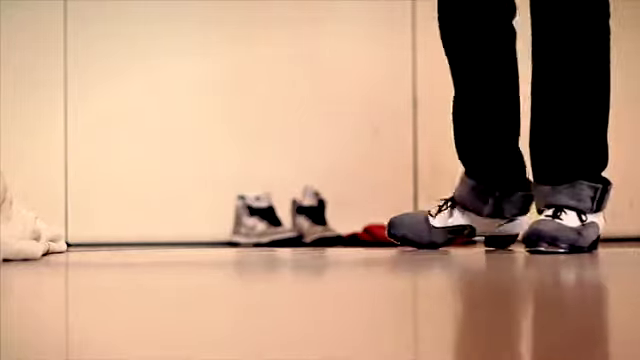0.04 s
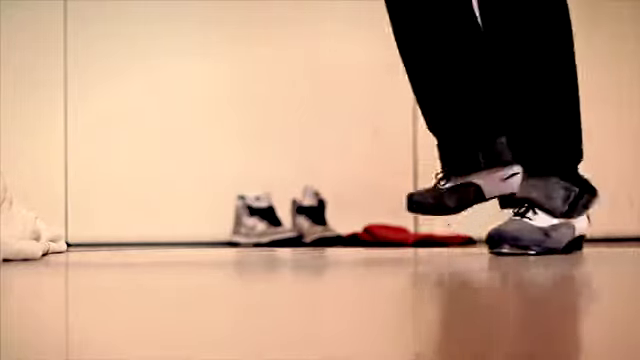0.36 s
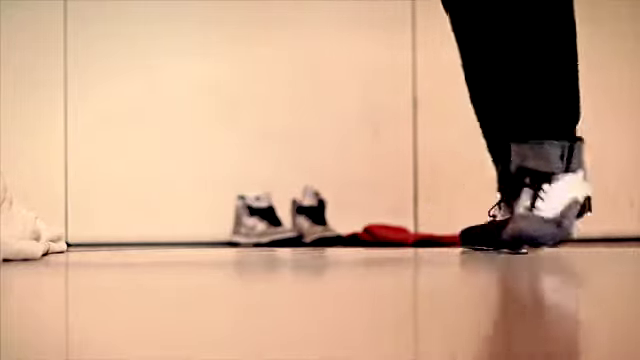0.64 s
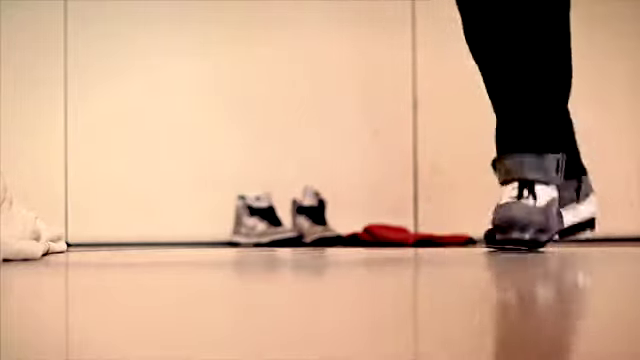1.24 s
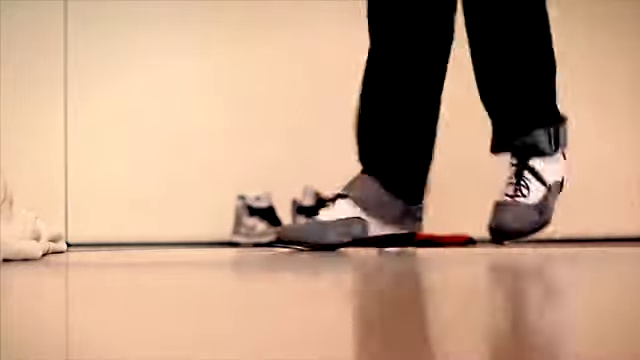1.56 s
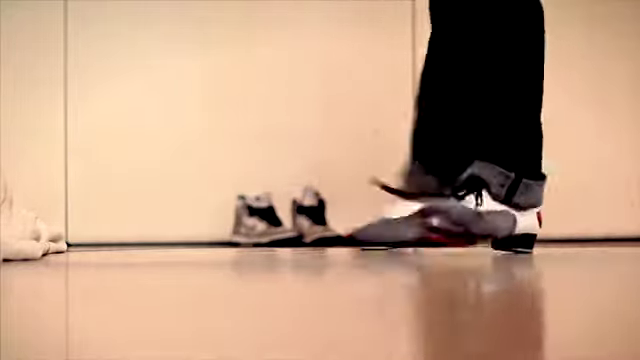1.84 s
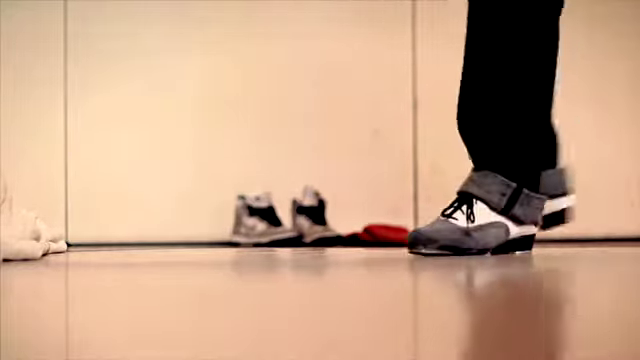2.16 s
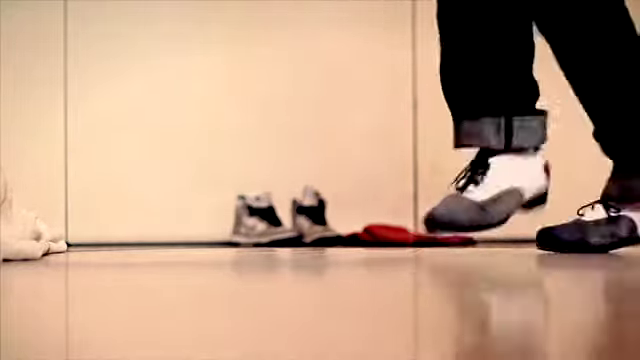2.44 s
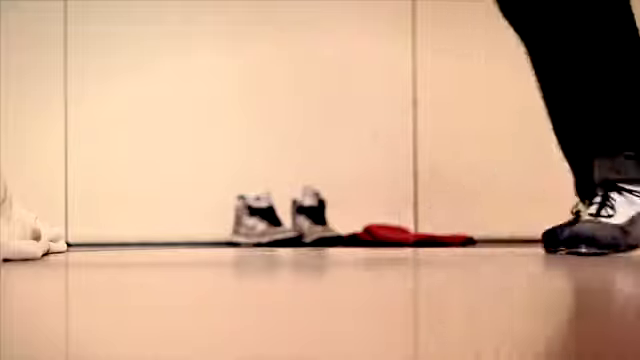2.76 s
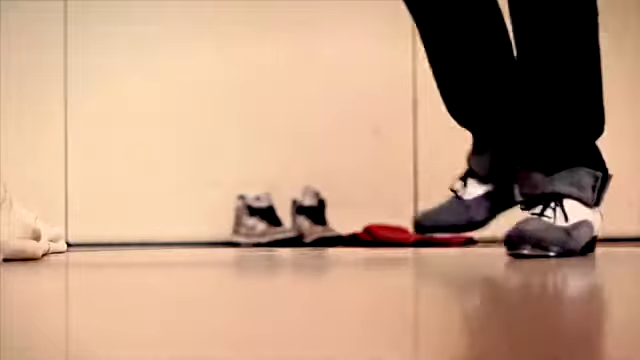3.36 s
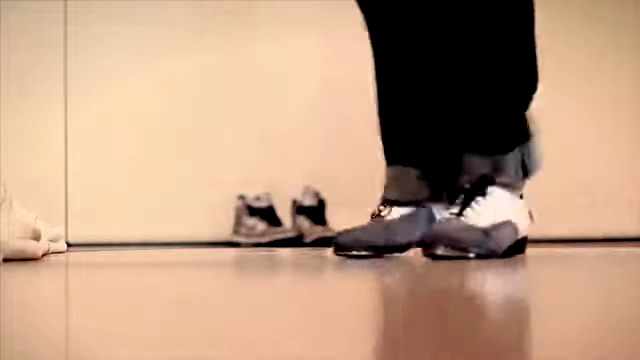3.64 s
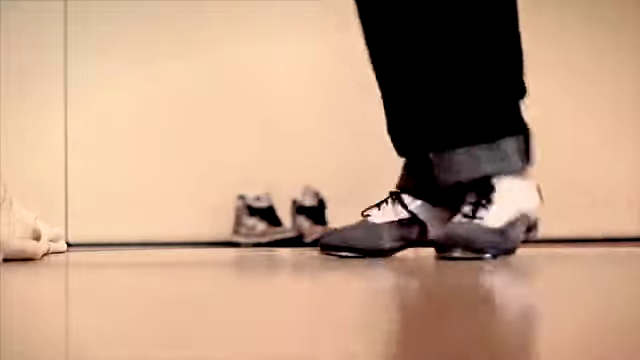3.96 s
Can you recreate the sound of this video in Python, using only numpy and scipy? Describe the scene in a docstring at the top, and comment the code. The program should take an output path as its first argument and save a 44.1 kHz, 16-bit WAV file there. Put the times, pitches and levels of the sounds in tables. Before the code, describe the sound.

Tap shoes click and stamp close by on a wooden floor, each hit echoing in a bare studio. Stamps land at the start and around 0.3, 1 and 1.6 seconds, with quick metallic taps between. A run of lighter taps follows from about 1.8 to 2.8 seconds, including a brief scuff and another stamp. Heavy, rattling stamps come from 3 to 3.6 seconds, then two last taps.

```python
"""Sharp metallic taps and heavy stamps ring out in a bare studio: a tap dancer, close by, on a sprung floor.
Each contact rings the shoe's metal plate, clacks the sole and thumps the boards. Flat stamps rattle the
plates, two heel drops and a faint tap clack hollowly, the floor booms under the weight and a toe scuffs.
Clicks flutter between floor and ceiling before the room takes over; a fast limiter holds the peaks."""
import sys
import numpy as np
from scipy import signal
from scipy.fft import rfft, irfft, next_fast_len
from scipy.io import wavfile
from scipy.ndimage import uniform_filter1d, minimum_filter1d

SR = 44100
rng = np.random.default_rng(int(sys.argv[2]) if len(sys.argv) > 2 else 0)


def output_pcm(signal):
    """Save a mono or channel-first signal as 16-bit PCM at the path in sys.argv[1].

    Samples are clipped to [-1, 1] before scaling.
    """
    pcm = np.clip(np.atleast_2d(signal).T, -1, 1) * 32767
    wavfile.write(sys.argv[1], SR, np.round(pcm).astype(np.int16))


N = 176400
LENGTH = 65536  # samples in one hit's buffer
T, HZ = np.arange(LENGTH) / SR, np.fft.rfftfreq(LENGTH, 1 / SR)
CLICK_GAIN, BITE_S = np.sqrt(SR / 200), .001  # common gain of the clicks; attack of plate and heel


# toe taps, plus the bright plate ring and metal after-snaps of stamps
# (t/s, plate ring/dB, sole clack/dB, metal snap/dB, room send/dB, plate pitch/Hz)
TAPS_AND_SNAPS = [(0.2605, -9, -21, -34, -12, 4200), (0.292, -29, -46, -26, -15, 4200),
                  (0.4763, -24, -30.5, -31, 0.5, 3400), (0.5898, -16.5, -26, -24.5, -1, 3790),
                  (0.6562, -24, -28, -26.5, -0.5, 3920), (0.7381, -26.5, -27.5, -48, 1, 3870),
                  (1.194, -29.5, -28.5, -27.5, 1, 3900), (1.309, -13.5, -20, -19, -3.5, 4130),
                  (1.4877, -14.5, -22, -24.5, -0.5, 3830), (1.85, -17.5, -25.5, -20, -2.5, 4060),
                  (1.9584, -20, -23, -18.5, -5, 3920), (2.059, -21, -28, -29.5, 1, 3560),
                  (2.1746, -25, -29, -26.5, 3, 4100), (2.291, -19.5, -26, -27, -1, 4000),
                  (2.5054, -62, -25.5, -17, -9.5, 4320), (2.5972, -21.5, -25, -22.5, -6.5, 4140),
                  (2.7209, -23, -29.5, -30, -2.5, 4030), (2.819, -25, -29.5, -34, 1.5, 4030),
                  (3.855, -14.5, -26, -25, -2.5, 3740), (3.9118, -29, -23, -28, -0.5, 3330)]
# weighty heels and stamps (t/s, plate ring/dB, sole clack/dB, metal snap/dB, room send/dB, thump/dB)
HEAVY_STAMPS = [(-.03, -15, -18, -22.5, 1.5, -19), (0.2611, -14.5, -13, -13, -3, -19),
                (0.8399, -23.5, -23.5, -29.5, 0.5, -31.5), (0.963, -7, -14, -15, -5, -15),
                (.972, -31, -16.5, -14.5, 1, -17), (1.5369, -18, -20.5, -22, 0, -28),
                (1.6329, -8.5, -14, -15, -3.5, -17), (2.49, -12.5, -14, -17, -4.5, -24.5),
                (2.9585, -15, -13, -11.5, -2.5, -20), (2.966, -20, -41, -41, 6.5, -28.5),
                (3.202, -13, -15, -17.5, -1.5, -44), (3.21, -34, -20.5, -12.5, 0, -17),
                (3.4435, -17, -20.5, -22, 1, -28), (3.455, -25, -19.5, -15, -8, -18.5),
                (3.633, -8, -15.5, -9.5, -9, -22), (3.6415, -42, -19, -15, 2, -18)]
def footwork():
    """Each contact layers plate, sole and boards, then sets off flutter, wash and standing waves."""
    out, echoes, standing = np.zeros(N), ceiling_flutter(), standing_waves()
    bite_delay = np.exp(-2j * np.pi * HZ * BITE_S)
    # taps and snaps set their thump 7 dB under their clack
    taps = [(s, rung, sole, snap, send, sole - 7, hz) for s, rung, sole, snap, send, hz in TAPS_AND_SNAPS]
    stamps = [(*row, PLATE_HZ) for row in HEAVY_STAMPS]
    for s, ring_db, clack_db, snap_db, send_db, thump_db, hz in taps + stamps:
        landing = amp(clack_db) * sole_clack() + amp(snap_db) * metal_snap()
        landing += amp(thump_db - 1.5) * board_knock()
        plate = amp(ring_db) * rfft(plate_ring(hz))
        click = plate + rfft(landing) * bite_delay
        wash = amp(send_db) * room_feed(plate, clack_db, snap_db, thump_db) * room_tail()
        hit = CLICK_GAIN * irfft(click * (1 + echoes) + wash) + amp(thump_db) * standing
        add(out, s, hit[:SR])
    return out


# modes of the shoe's metal plate (f/Hz, level/dB, t60/s)
PLATE_MODES = [(3450, -6, .004), (3950, 0, .008), (4450, -6, .004), (7200, -14, .003)]
PLATE_HZ = 3950  # its main mode
def plate_ring(hz):
    """The struck plate's bright ping, its main mode tuned near hz."""
    return ring(PLATE_MODES, BITE_S, stretch=hz / PLATE_HZ)


# dry midrange colour of the sole (f/Hz, level/dB)
SOLE_COLOUR = [(150, -15), (450, -12.5), (700, -1.5), (1400, -3), (2200, -5.5), (3200, -1), (6000, -71)]
def sole_clack():
    """The sole slaps the floor and gives the hit its body."""
    return blow(SOLE_COLOUR, t60=.044, grit=.91)


# crisp colour of metal on the floor (f/Hz, level/dB)
SNAP_COLOUR = [(1000, -18), (3000, -15.5), (5000, 4), (6400, 2.5), (7600, 1.5), (9000, -7), (11000, -16.5),
               (16000, -30)]
def metal_snap():
    """The plate meets the floor and gives the hit its edge."""
    return blow(SNAP_COLOUR, t60=.0091, grit=1)


# modes of the floorboards (f/Hz, level/dB, t60/s)
BOARD_MODES = [(149, -0.5, 0.039), (300.6, -1, 0.037)]
def board_knock():
    """The boards answer with a low wooden knock."""
    return ring(BOARD_MODES, rise_s=.00597)


# hollow clacks: two heel drops and one faint light tap (t/s, level/dB)
HOLLOW_CLACKS = [(1.537, -19.5), (1.635, -19.5), (2.377, -30.5)]
# modes of the heel block (f/Hz, level/dB, t60/s)
HEEL_MODES = [(1420, -4, .007), (1700, -2, 0.0076)]
def hollow_clacks():
    """Two fast-dying midrange modes ring as a hollow clack."""
    out = np.zeros(N)
    for s, db in HOLLOW_CLACKS:
        add(out, s, amp(db) * CLICK_GAIN * ring(HEEL_MODES, BITE_S))
    return out


# rattles after flat stamps (t/s, level/dB)
PLATE_RATTLES = [(0.974, -18.5), (2.965, -17), (3.214, -16), (3.463, -25.5), (3.645, -17.5)]
def plate_rattles(count=7, span_s=.044, fade_db=5.5, pitch_hz=6300):
    """Loose plates chatter in a few uneven snaps, pinging higher than a tap."""
    out = np.zeros(N)
    for s, db in PLATE_RATTLES:
        for progress in (np.arange(count) + rng.random(count)) / count:
            gain = amp(db - fade_db * progress + rng.normal(0, 1.3))
            ping = plate_ring(pitch_hz * (1 + rng.normal(0, .042)))
            add(out, s + progress * span_s, gain * CLICK_GAIN * unit(ping + metal_snap()))
    return out


# the dancer's weight landing (t/s, level/dB)
LANDINGS = [(0.2634, -24.5), (0.842, -33.5), (1.634, -28), (2.49, -35.5), (2.958, -32.5), (3.444, -39.5)]
# bass colour of the sprung floor (f/Hz, level/dB)
BOOM_COLOUR = [(30, -25), (55, -11.5), (105, -2.5), (400, -79)]
def floor_booms(peak_s=.083, width_s=.047, rise_s=.0026):
    """The sprung floor swells and booms just after the weight lands."""
    out = np.zeros(N)
    swell = np.exp(-.5 * ((T - peak_s) / width_s) ** 2) * (1 - np.exp(-T / rise_s))
    for s, db in LANDINGS:
        add(out, s, amp(db) * unit(swell * noise(BOOM_COLOUR, LENGTH)) * np.linalg.norm(swell))
    return out


# hissy colour of sliding metal (f/Hz, level/dB)
SCUFF_COLOUR = [(2500, -39), (4600, 4), (6100, 8), (8500, -36)]
def toe_scuff(middle_s=2.245, width_s=.024, level_db=-29.5):
    """A toe plate brushes the floor in one short hiss."""
    stroke = np.exp(-.5 * ((np.arange(N) / SR - middle_s) / width_s) ** 2)
    return amp(level_db) * stroke * noise(SCUFF_COLOUR, N)


def ceiling_flutter(trip_s=.0113, first_db=-9.5, loss_db=6, low_cut_hz=4500):
    """Frequency response of three bright echoes between floor and ceiling."""
    trips = sum(amp(first_db - loss_db * k) * np.exp(-2j * np.pi * HZ * trip_s * (k + 1))
                for k in range(3))
    return trips * 1j * HZ / (low_cut_hz + 1j * HZ)


# colour the floor thump sends into the room (f/Hz, level/dB)
THUMP_COLOUR = [(25, -30), (50, 8.5), (160, 1.5), (300, -3), (430, -8.5), (900, -4), (3000, -136)]
def room_feed(plate, clack_db, snap_db, thump_db):
    """The room gathers a hit from all sides, so its layers add in power to a smooth spectrum."""
    radiated = abs(uniform_filter1d(abs(plate) ** 2, size=1100))
    for db, colour in (clack_db, SOLE_COLOUR), (snap_db, SNAP_COLOUR), (thump_db, THUMP_COLOUR):
        power = amp(along(colour, HZ)) ** 2
        radiated += amp(db) ** 2 * power / power.mean()
    return np.sqrt(radiated)


# reverb time of the studio (f/Hz, t60/s)
STUDIO_DECAY = [(60, 0.21), (160, 1.6), (420, 0.95), (5500, 0.79), (8000, 0.6), (14000, 0.54)]
# tone of its reverb (f/Hz, level/dB)
STUDIO_COLOUR = [(80, -1.5), (165, 4.5), (430, 3.5), (850, 4.5), (1250, 3.5), (3900, -3.5), (6200, 4.5),
                 (8000, 3), (15000, -1)]
def room_tail(early_s=.07, predelay_s=.00071, rise_s=.0026):
    """Spectrum of a fresh tail: spiky early reflections merge into a wash, each band at its own decay."""
    spikiness = 1.35 * np.exp(-T / early_s)
    reflections = rng.standard_normal(LENGTH)
    reflections *= np.exp(spikiness * np.minimum(rng.standard_normal(LENGTH), np.pi) - spikiness ** 2)
    hz, t, bands = signal.stft(reflections, SR, nperseg=512)
    decay = fade(along(STUDIO_DECAY, hz)[:, None], t)
    tail = signal.istft(bands * decay, SR, nperseg=512)[1][:LENGTH]
    onset = 1 - np.exp(-np.maximum(T - predelay_s, 0) / rise_s)
    return rfft(unit(tail * onset)) * amp(along(STUDIO_COLOUR, HZ))


# resonances of the studio (f/Hz, level/dB, t60/s)
STUDIO_MODES = [(158.8, -13.5, 1.45), (222, -19, 1.28), (810, -27, .55)]
def standing_waves():
    """A thump leaves the room humming at its own pitches."""
    return sum(amp(db) * fade(t60) * np.sin(2 * np.pi * hz * T) for hz, db, t60 in STUDIO_MODES)


# dark colour of the still room (f/Hz, level/dB)
HUSH_COLOUR = [(30, -22), (150, 11), (4000, -27), (15000, -50)]
def room_tone(level_db=-58):
    """A faint, steady hush under the dance."""
    return amp(level_db) * noise(HUSH_COLOUR, N)


def ring(modes, rise_s, stretch=1, size=4096):
    """Damped modes of a struck part; balance and tuning vary with each landing."""
    t, tone = T[:size], np.zeros(size)
    for hz, db, t60 in modes:
        envelope = amp(db + rng.normal(0, 3.3)) * fade(t60, np.maximum(t - rise_s, 0))
        pitch = hz * stretch * (1 + .012 * rng.normal())
        tone += envelope * np.sin(2 * np.pi * pitch * (t - rise_s))
    attack = np.minimum(t / rise_s, 1) ** 2
    return np.pad(unit(tone * attack), (0, LENGTH - size))


def blow(colour, t60, grit):
    """An impulse with a short noisy after-sound (grit), coloured by what is struck."""
    push = grit * unit(rng.standard_normal(LENGTH) * fade(t60))
    push[0] += 1
    return unit(irfft(rfft(push) * minimum_phase(colour)))


def minimum_phase(colour):
    """Response of a colour with no ringing ahead of the attack."""
    cepstrum = irfft(np.log(amp(along(colour, HZ))))
    cepstrum[1:LENGTH // 2] *= 2
    cepstrum[LENGTH // 2 + 1:] = 0
    return np.exp(rfft(cepstrum))


def noise(colour, size):
    """Coloured noise of rms 1."""
    gains = amp(along(colour, np.fft.rfftfreq(size, 1 / SR)))
    x = irfft(rfft(rng.standard_normal(size)) * gains, size)
    return x / x.std()


def amp(db):
    """Decibels to gain."""
    return 10 ** (np.asarray(db) / 20)


def unit(x):
    """Scale to energy 1."""
    return x / np.sqrt(np.sum(x ** 2) + 1e-20)


def along(points, hz):
    """Read (f/Hz, value) points on a log axis."""
    freqs, values = np.transpose(points)
    return np.interp(np.log(hz + 1), np.log(freqs), values)


def fade(t60, t=T):
    """Exponential decay by 60 dB in t60."""
    return np.exp(-np.log(1000) * t / t60)


def add(track, s, x):
    """Mix x into the track at time s."""
    k = int(round(s * SR))
    part = x[max(0, -k):max(0, N - k)]
    track[max(0, k):max(0, k) + len(part)] += part


def scene():
    """The dancer over the hush of the studio, in mono."""
    dance = footwork() + hollow_clacks() + plate_rattles() + floor_booms() + toe_scuff()
    return (dance + room_tone())[None]


def record(dry):
    """A fast limiter holds the peaks, then a steep low-pass trims the top."""
    ceiling, hold_s, top_hz = .92, .0003, 16000
    window = 2 * int(hold_s * SR) + 1
    gain = np.minimum(1, ceiling / (np.abs(dry) + 1e-9))
    gain = uniform_filter1d(minimum_filter1d(gain, window), window)
    padded = next_fast_len(N + SR // 2)
    passband = np.fft.rfftfreq(padded, 1 / SR) < top_hz
    return irfft(rfft(dry * gain, padded) * passband, padded)[:, :N]


dry = scene()
out = record(dry)
output_pcm(out)
```